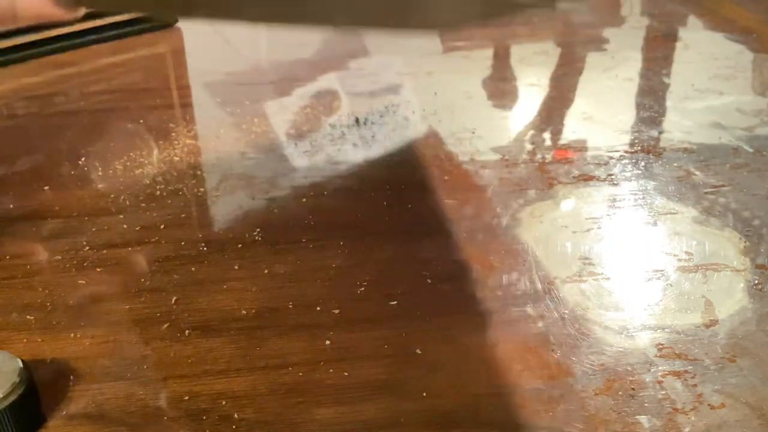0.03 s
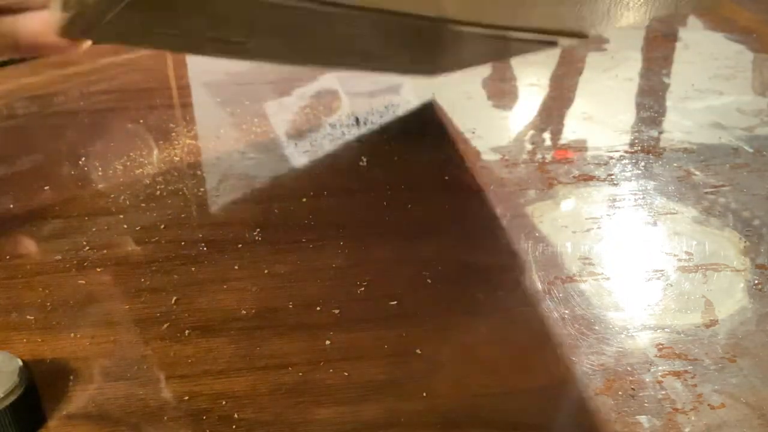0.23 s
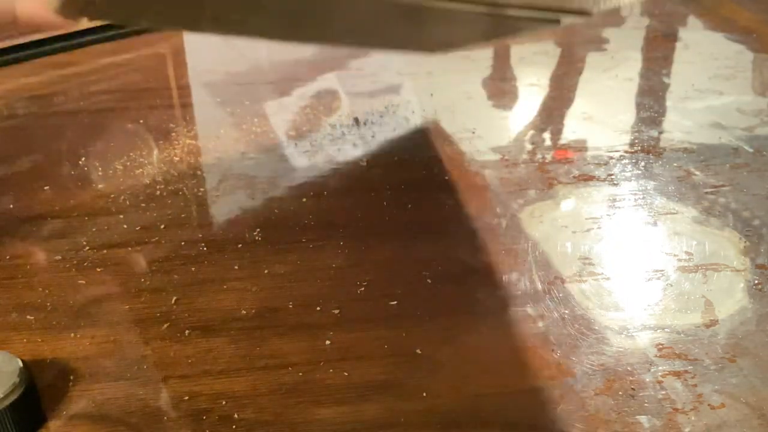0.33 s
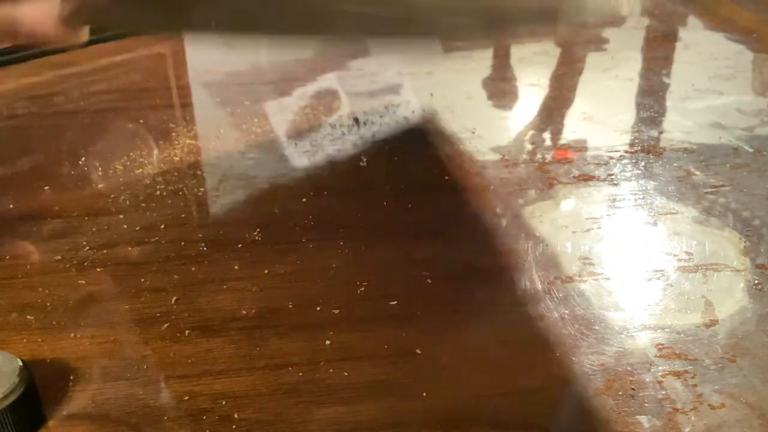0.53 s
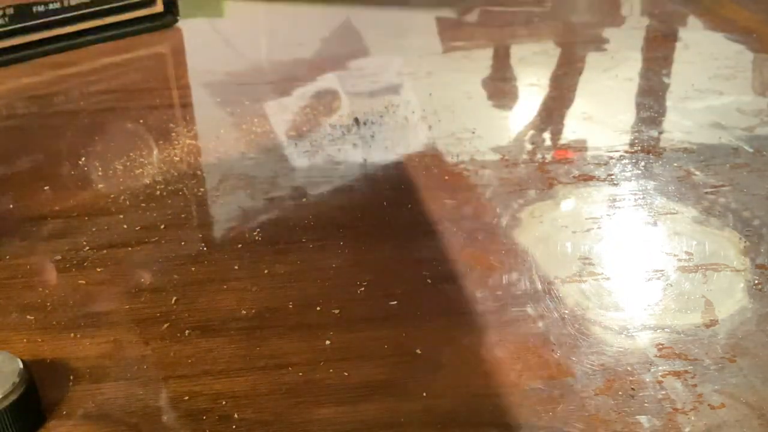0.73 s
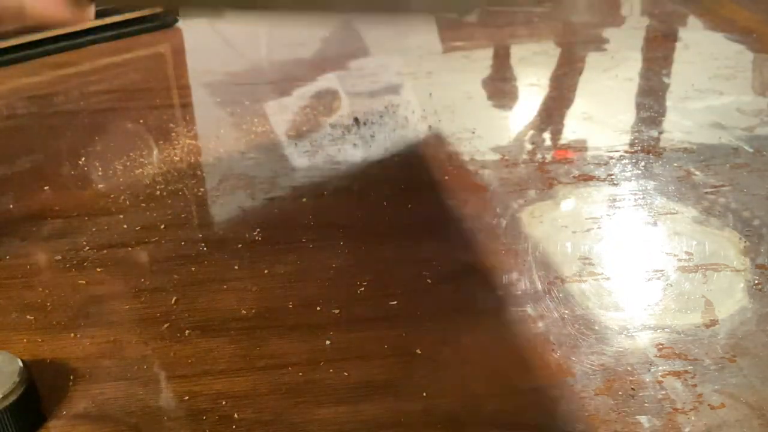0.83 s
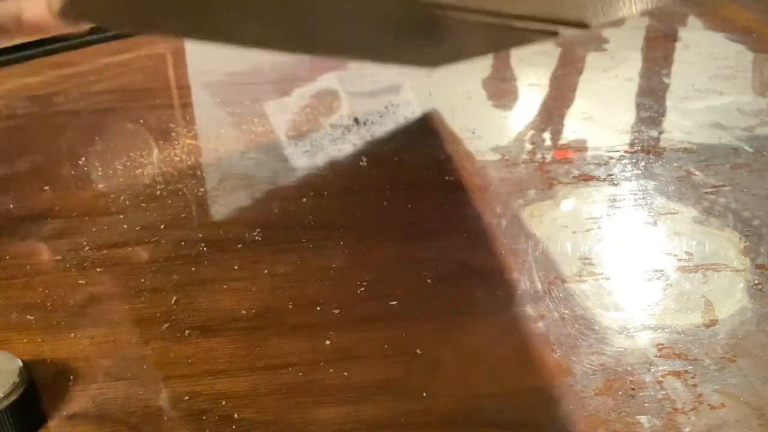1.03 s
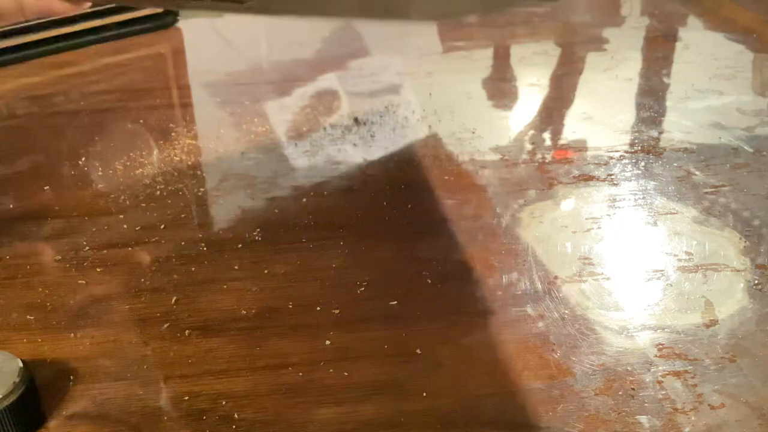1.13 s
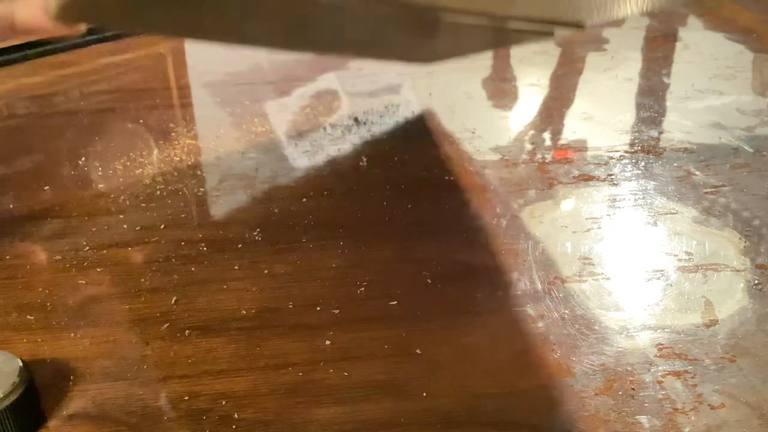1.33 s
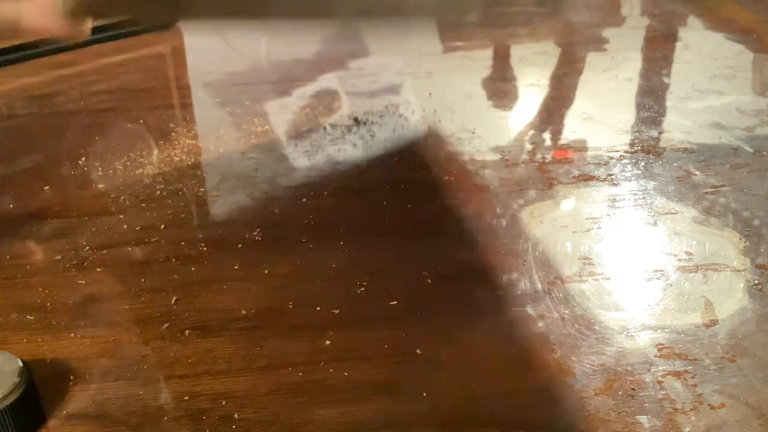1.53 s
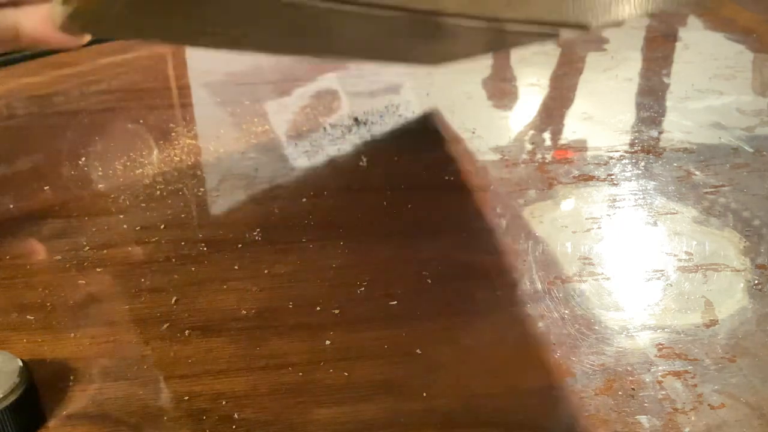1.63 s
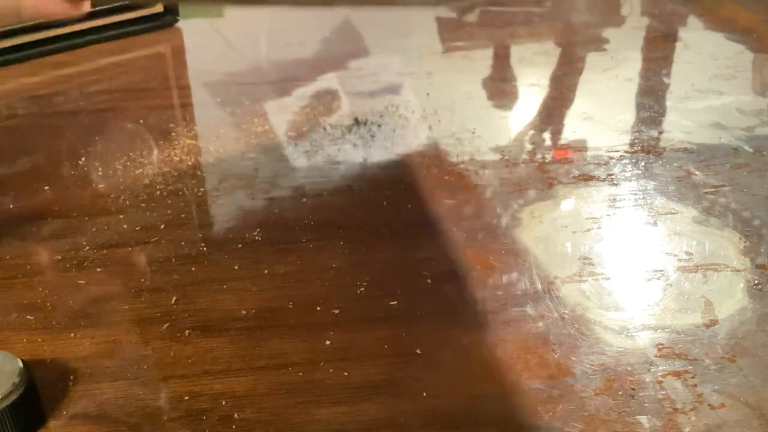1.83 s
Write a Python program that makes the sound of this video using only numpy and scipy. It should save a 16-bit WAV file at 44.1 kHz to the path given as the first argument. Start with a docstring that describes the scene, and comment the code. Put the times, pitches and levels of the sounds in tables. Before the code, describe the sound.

A flat, stiff object knocks on a wooden table, close by, at about 0.2, 0.6, 0.9, 1.3 and 1.6 seconds. Each hit is a sharp slap with a hollow wooden thump and a brief clank, followed by a tiny rattle as the object settles. The knocks are similar in strength and ring out quickly in a small, quiet room with a very faint hum.

```python
"""A flat, stiff object is knocked down on a wooden table, close by, about three times a second.
At first a small, quiet room hums faintly while an earlier knock dies away. A light touch follows.
Then come five knocks. In each, the edge ticks, the face slaps down, and the tabletop booms while
the object clanks. The room answers, and the object rattles as it settles."""
import sys
import numpy as np
from scipy import signal
from scipy.fft import rfft, irfft
from scipy.io import wavfile

SR = 44100
rng = np.random.default_rng(int(sys.argv[2]) if len(sys.argv) > 2 else 0)


def output_pcm(signal):
    """Save a mono or channel-first signal as 16-bit PCM at the path in sys.argv[1].

    Samples are clipped to [-1, 1] before scaling.
    """
    pcm = np.clip(np.atleast_2d(signal).T, -1, 1) * 32767
    wavfile.write(sys.argv[1], SR, np.round(pcm).astype(np.int16))


N = 83790

# The hiss of the room's air. Each row: frequency in Hz, relative level in dB.
AIR_SPECTRUM = [(25, -22.5), (60, -5), (118, -5.5), (326, -13), (500, -11.5), (750, -22.5), (1500, -30.5),
                (2400, -26), (3700, -37.5), (6000, -39), (7000, -43.5), (15000, -51.5)]
# The tones of the hum. Each row: pitch in Hz, level in dB.
HUM_TONES = [(102.3, -76), (436, -70.5), (516.8, -81.5), (635.2, -75.5)]
# The knocks; the first only rings out. Each row: start in seconds, thump level in dB,
# slap and clank level in dB, brightness in dB per octave, room level in dB. Levels are relative.
KNOCKS = [(-.17, -1.5, 0, 0, -3.5), (0.2015, -1, 0, -0.5, -1), (0.5653, -2, 0.5, -1, -1),
          (0.8873, -2.5, 2, -1, 1), (1.2533, -2, -1, -1, -4), (1.5774, -1, 2.5, -0.5, -0.5)]
# The tones of the tabletop. Each row: pitch in Hz, relative level in dB, fade time in seconds.
# A fade time, or t60, is how long a sound takes to drop by 60 dB.
TABLETOP_TONES = [(97, -20, .21), (126.5, -19.5, 0.31), (159.5, -35.5, 0.36), (209, -12, 0.057),
                  (234.2, 0.5, .052), (264.5, -31, 0.36), (302.7, -23, 0.25), (325.7, -7.5, 0.11),
                  (396.8, -19, 0.21), (434.1, -11, .13), (505.8, -23.5, 0.2), (567, -20.5, 0.13),
                  (631, -19.5, .17)]
# The tone colour of the slap and of the room's answer.
# Each row: frequency in Hz, relative slap level in dB, relative room level in dB.
KNOCK_SPECTRA = [(40, -6, -6.5), (80, -15.5, -9), (165, -5, -3.5), (275, -7.5, 0), (530, 0.5, 2.5),
                 (720, -4.5, -9.5), (865, -9.5, -4.5), (1320, 1, -6.5), (1530, -8, -14), (2370, -11, -13.5),
                 (3060, -12.5, -15), (4400, -13.5, -18.5), (5100, -14, -12.5), (6086, -12, -15),
                 (6128, -20, -23), (10400, -23.5, -25), (12900, -25, -26), (15500, -25, -30.5)]
# How long each band lasts. Each row: frequency in Hz, slap fade in seconds, room fade in seconds.
BAND_FADES = [(100, 0.23, 0.49), (392, 0.2, 0.3), (1300, .11, 0.35), (4830, 0.13, 0.35), (8050, 0.11, 0.31),
              (15000, 0.053, 0.27)]
# The tones of the flat object. Each row: pitch in Hz, relative level in dB.
OBJECT_TONES = [(680, -23), (837, -21.5), (1041, -22.5), (1150, -21.5), (1262, -22.5), (1329, -18),
                (1385, -21.5), (1444, -24), (1871, -29), (2000, -29), (2310, -29.5), (2625, -29.5),
                (2874, -29.5), (3195, -32.5)]
# The small bounces. Each row: start in seconds, clack level in dB, tinny ring in dB, tick in dB.
RATTLES = [(.2150, -22.5, -21, -28), (.2230, -16.5, -30, -35), (0.2299, -15.5, -19, -33.5),
           (0.2401, -33, -27.5, -29.5), (0.244, -27.5, -27.5, -52.5), (0.2566, -38, -35.5, -53),
           (0.577, -20, -32.5, -30.5), (0.6028, -24, -35, -34.5), (.6170, -35, -38.5, -54.5),
           (0.9394, -24, -29, -39), (1.2692, -17, -21.5, -29), (1.6120, -21, -34.5, -40),
           (1.6159, -27.5, -32.5, -40), (1.6305, -34.5, -31.5, -45), (1.64, -42.5, -33, -51.5)]

ROOM_RISE_S, SLAP_RISE_S = 0.013, 0.0004  # how fast these sounds swell
FREQS_HZ = np.arange(N // 2 + 1) * SR / N


def gain(db):
    """Turn decibels into a number to multiply by."""
    return 10 ** (np.asarray(db) / 20)


def at_hz(hz, points, values):
    """Read between a table's rows, giving each octave equal space."""
    return np.interp(np.log(hz + 1), np.log(points), values)


def noise(gains):
    """Noise of strength 1, shaped by one gain for each frequency."""
    wave = irfft(gains * np.exp(2j * np.pi * rng.random(len(gains))), N)
    return wave / wave.std()


def resonance(hz, width_hz):
    """Noise of strength 1, gathered around one pitch."""
    f = FREQS_HZ + 1
    return noise(1 / (1 + ((f * f - hz * hz) / (f * width_hz)) ** 2))


def since(start):
    """Seconds since a moment, zero before it."""
    return np.maximum(np.arange(N) / SR - start, 0)


def fade(t, t60, rise_s=1e-4):
    """Swell quickly, then drop by 60 dB every t60 seconds."""
    return (1 - np.exp(-t / rise_s)) * np.exp(-np.log(1000) * t / t60)


def ringing_bands(points_hz, levels_db, tilt_db, ripple_db):
    """Noise with many small resonances, new for every blow, split into bands from low to high."""
    colour_db = at_hz(FREQS_HZ, points_hz, levels_db) + tilt_db * np.log2((FREQS_HZ + 1) / 1280)
    bumps = rng.standard_normal(size=2000)
    ripple = np.interp(FREQS_HZ / 55, np.arange(len(bumps)), bumps)  # one bump or dip every 55 Hz
    spectrum = rfft(noise(gain(colour_db + ripple_db * ripple)))
    centres_hz = np.array(BAND_FADES)[:, 0]
    return [irfft(spectrum * at_hz(FREQS_HZ, centres_hz, pick), N) for pick in np.eye(len(centres_hz))]


def background():
    """Still room air and a faint, wavering hum."""
    air = noise(gain(at_hz(FREQS_HZ, *np.array(AIR_SPECTRUM).T)))
    hum = 0
    for hz, db in HUM_TONES:
        tone = np.sin(2 * np.pi * (hz * since(0) + rng.random()))
        waver = 0.91 * resonance(hz, width_hz=10)
        hum += gain(db) * (tone + waver)
    return gain(-63) * air + hum


def thump(start):
    """The struck tabletop rings with its own tones; neighbouring tones swing opposite ways."""
    t = since(start + 0.002)
    return sum((-1) ** k * gain(db) * fade(t, t60, rise_s=0.00078) * np.sin(2 * np.pi * hz * t)
               for k, (hz, db, t60) in enumerate(TABLETOP_TONES))


def room(start, tilt_db):
    """The room answers a knock with a blur of echoes; the highest sounds die first."""
    hz, _, room_db = np.array(KNOCK_SPECTRA).T
    bands = ringing_bands(hz, room_db, tilt_db, ripple_db=1)
    t = since(start)
    return sum(band * fade(t, t60, ROOM_RISE_S) for band, (_, _, t60) in zip(bands, BAND_FADES))


def light_touch():
    """One soft, dull touch just before the first full knock."""
    return resonance(hz=480, width_hz=180) * fade(since(0.174), t60=0.2, rise_s=0.0015)


def slap(start, tilt_db):
    """The edge touches first, then the face lands with a crack; object and table ring briefly."""
    edge = gain(-3) * fade(since(start), t60=0.042)
    t = since(start + 0.0029)  # the face lands this many seconds later
    crack = gain(-1) * fade(t, t60=0.03, rise_s=SLAP_RISE_S)
    contact = np.hypot(edge, crack)  # hypot adds the energy of two sounds
    hz, slap_db, _ = np.array(KNOCK_SPECTRA).T
    bands = ringing_bands(hz, slap_db, tilt_db, ripple_db=2)
    return sum(band * np.hypot(contact, fade(t, t60, SLAP_RISE_S))
               for band, (_, t60, _) in zip(bands, BAND_FADES))


def clank(start):
    """The object's own short tones vary, as the grip and contact spot differ from blow to blow."""
    t, ring = since(start), 0
    for k, (hz, db) in enumerate(OBJECT_TONES):
        level_db = db + 1.5 * rng.standard_normal()
        pitch_hz = hz * (1 + 0.0052 * rng.standard_normal())
        ring += (-1) ** k * gain(level_db) * np.sin(2 * np.pi * pitch_hz * t)
    return ring * fade(t, t60=0.12, rise_s=SLAP_RISE_S)


def rattles():
    """The object settles in small bounces: each a clack, a tinny ring and a tick, with a faint echo."""
    t = since(0)
    echo = gain(-22) * fade(t, t60=0.22, rise_s=ROOM_RISE_S)

    def bounces(column, hz, width_hz, t60):
        """One part of the rattle: add up the energy of every bounce and shape noise with it."""
        one_bounce = fade(t, t60) ** 2 + echo ** 2
        energy = np.zeros(N)
        for row in RATTLES:
            first = int(row[0] * SR)
            energy[first:] += gain(row[column]) ** 2 * one_bounce[:N - first]
        return resonance(hz, width_hz) * np.sqrt(energy)

    clack = bounces(column=1, hz=1280, width_hz=430, t60=0.021)
    tinny_ring = bounces(column=2, hz=5400, width_hz=950, t60=0.028)
    tick = bounces(column=3, hz=10100, width_hz=10000, t60=0.025)
    return clack + tinny_ring + tick


def scene():
    """Add the rattles, the touch and the knocks to the quiet room."""
    mix = rattles() + gain(-43) * light_touch()
    for start, thump_db, contact_db, tilt_db, room_db in KNOCKS:
        contact = gain(-12.5) * slap(start, tilt_db) + gain(-1) * clank(start)
        mix += gain(contact_db) * contact
        mix += gain(thump_db + 1.5) * thump(start)
        mix += gain(room_db - 22) * room(start, tilt_db)
    # Cut the deep bass below 82 Hz from the knocks, rattles, touch and echoes.
    low_cut = signal.butter(4, 82, "high", fs=SR, output="sos")
    return (signal.sosfilt(low_cut, mix) + background())[None]


def record(dry):
    """Round off the loudest peaks and cut the very highest sounds."""
    ceiling, top_hz = 0.88, 15700
    rounded = dry / (1 + (dry / ceiling) ** 6) ** (1 / 6)
    high_cut = signal.ellip(8, 0.2, 80, top_hz, fs=SR, output="sos")
    return signal.sosfilt(high_cut, rounded)


dry = scene()
out = record(dry)
output_pcm(out)
```